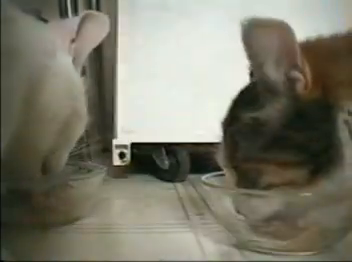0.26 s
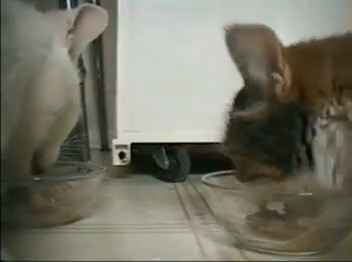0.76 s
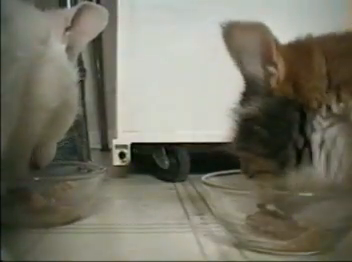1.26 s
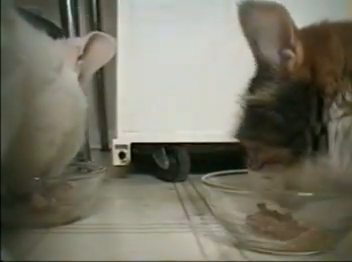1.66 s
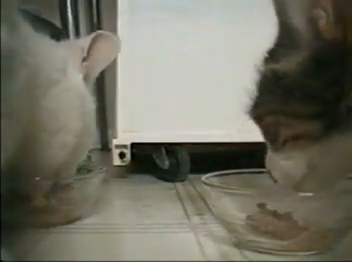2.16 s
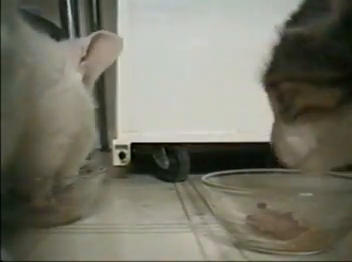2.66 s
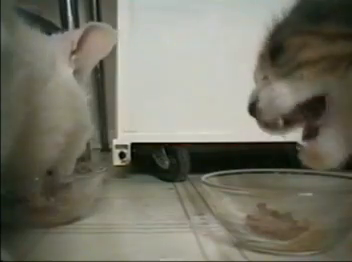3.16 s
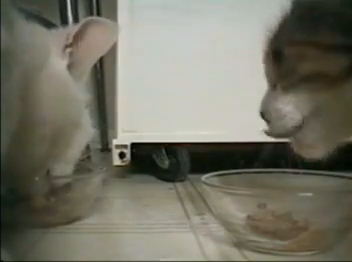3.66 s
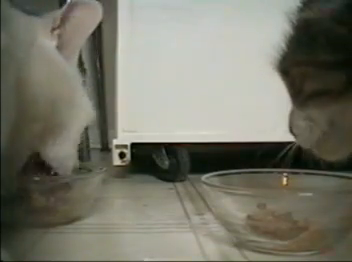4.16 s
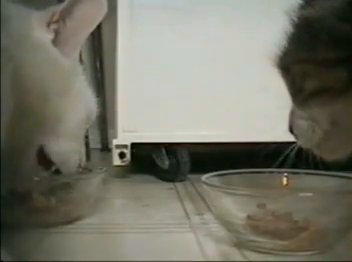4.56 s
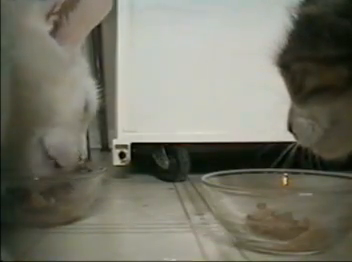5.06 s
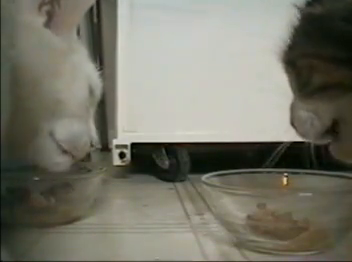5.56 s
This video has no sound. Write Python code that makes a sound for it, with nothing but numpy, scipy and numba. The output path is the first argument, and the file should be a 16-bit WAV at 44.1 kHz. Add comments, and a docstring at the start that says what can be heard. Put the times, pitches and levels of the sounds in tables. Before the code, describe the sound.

A small kitchen, heard close to the floor in stereo, with short, dry reflections. Steady low-mid appliance rumble, soft hiss and a thin wavering whine run throughout. From 0 to about 1.95 s a cat growls low and unevenly, a nasal, rattling buzz that turns brighter and more open with each of five chews; wet smacks and small glass-bowl ticks accompany it, the ticks mostly in the first half second. From 2 to 3 s only sparse moist clicks remain, one strong at 2.8. At about 3.05 a hiss builds into sharp spits near 3.2, then a harder spit and long hiss from 3.35 to 3.75. Around 4.0 come a loud wet smack, glass clicks and a soft sniff. A creak at 4.3 climbs into a clear yowl, peaking near 4.65 and sinking until 5.4. It creaks again, then yelps at 5.65 with two brief snarls, the second at 5.8 with a spit.

```python
"""Cats guarding their bowls

Two cats sit over their food on a kitchen floor, heard close up in stereo.
The eater growls: uneven pulses ring its nose and chewing mouth, with wet smacks and ticks on a glass bowl.
The other cat spits and hisses in shaped noise, then creaks, yowls in clean partials, yelps and snarls.
Coloured noise makes the appliance rumble behind them, and one wavering sine the thin whine.
"""
import sys
import numpy as np
from scipy import signal
from scipy.fft import rfft, irfft
from scipy.io import wavfile
from scipy.ndimage import uniform_filter1d
from numba import njit

SR = 44100
rng = np.random.default_rng(int(sys.argv[2]) if len(sys.argv) > 2 else 0)


def generate_wav(signal):
    """Clip the signal to [-1, 1] and save it as 16-bit WAV at the path in sys.argv[1]."""
    frames = np.transpose(np.atleast_2d(signal))
    scaled = np.clip(frames, -1, 1) * 32767
    pcm = np.round(scaled).astype(np.int16)
    wavfile.write(sys.argv[1], SR, pcm)


N = 257103
T = np.arange(N) / SR

# rumble and hiss of the kitchen: (frequency [Hz], relative density [dB])
ROOM_TONE = [(20, -13.5), (40, -35), (86, -28), (125, -24.5), (170, -17), (260, -5.5), (365, 0.5),
             (480, -4), (690, -10), (1050, -16.5), (1500, -14), (2100, -21), (2700, -22), (3200, -21),
             (4000, -29.5), (5800, -25), (7200, -33.5), (8080, -49), (9000, -34.5), (10200, -36),
             (13300, -45.5), (14200, -59)]
ROOM_TONE_DB, WHINE_HZ, WHINE_DB = -39, 1437, -43.5
# phase between the microphone ports: (frequency [Hz], lead of the left [rad])
PORT_PHASE = [(0, 0), (260, 2.1), (600, 0.7), (950, 1.5), (2150, 0.3), (4650, -0.5), (5170, -1.3),
              (6370, 0.2), (7750, -0.2), (10300, 0.6), (11600, 0.1), (14600, -0.0), (15100, 0.4),
              (15800, -0.3)]
# balance of the ports before panning: (frequency [Hz], left minus right [dB])
PORT_BALANCE = [(60, -1), (110, -2), (200, -7.5), (380, -2.5), (700, -8), (1290, -6.5), (2380, -4),
                (4400, -3), (8120, -3), (15000, -4)]
ROOM_T60_S, ROOM_DB = .05, -5
DIFFUSE_ABOVE_HZ, TOP_HZ = 2500, 15700

# teeth on the glass bowl: (time [s], level [dB])
BOWL_TICKS = [(0.036, -39), (.088, -34.5), (.203, -33), (.325, -29.5), (.378, -29), (0.4437, -35),
              (.454, -33), (3.785, -36), (4.0105, -25), (4.0255, -22.5), (4.046, -31.5), (4.974, -36)]
# partials of the bowl: (frequency [Hz], level [dB], decay by 60 dB [s])
BOWL_PARTIALS = [(4750, -1.5, 0.014), (5904, 0, 0.0062), (9680, -6.5, 0.0042), (12400, -16, .008)]
# wet smacks: (time [s], level [dB], ring [Hz], splash decay [s])
SMACKS = [(0.124, -19, 1460, 0.0037), (0.161, -20.5, 2100, 0.0022), (0.315, -22, 1680, 0.0029),
          (.331, -27, 2500, 0.005), (0.4416, -14, 2260, 0.00076), (0.455, -16, 2360, 0.00054),
          (0.803, -20.5, 1580, 0.0029), (0.9015, -21, 1680, 0.0027), (1.267, -19, 2320, 0.00079),
          (1.491, -22.5, 1586, 0.002), (1.9969, -19.5, 1700, 0.00063), (2.1886, -23, 1650, 0.0007),
          (2.2163, -21.5, 1680, 0.003), (2.237, -16, 2040, 0.0004), (2.2564, -18, 1370, 0.0014),
          (2.456, -25, 1970, 0.00081), (2.465, -26, 1830, 0.00065), (2.607, -29, 1480, 0.0015),
          (2.735, -27, 1510, 0.002), (2.7702, -9.5, 1350, 0.00044), (2.973, -22, 1560, .0015),
          (3.872, -26, 2110, 0.00081), (3.957, -25, 1420, .004), (4.0101, -32, 1450, .001),
          (4.0252, -8.5, 1310, 0.00061), (4.044, -20.5, 830, 0.0022), (5.01, -36, 2390, .002),
          (5.285, -26, 2383, 0.0018)]

# All resonance widths below are those of the narrowest of three stages.
# nose: (centre [Hz], width [Hz], level [dB])
NOSE = [(475.6, 189, 12), (249, 104, 3.5), (758, 180, -7.5)]
# air in the nostrils: (centre [Hz], width [Hz], level [dB])
NOSTRIL_AIR = [(3340, 830, -38.5), (4190, 1100, -35.5), (8150, 3400, -42), (12400, 1400, -49.5)]
# mouth above its moving resonance: (centre [Hz], width [Hz], level [dB])
UPPER_MOUTH = [(1173, 160, -6.5), (2545, 350, -15), (5630, 1600, -30.5), (9800, 2200, -39.5),
               (13900, 1800, -37)]
# a weaker slap of the folds reaches the mouth half an average cycle later
REOPEN_DB = -11

# the long growl: (time [s], pulse rate [Hz], effort [dB], steadiness [0-1])
GROWL = [(0, 133.7, -27.5, 0.12), (.108, 122.6, -26, 0), (.25, 124.5, -23, 0.16), (.33, 119.9, -27.5, 0),
         (.444, 116.3, -23, 0), (.532, 124.1, -23, 0.08), (.602, 124.5, -25, 0.02),
         (.7, 112.8, -27.5, 0.05), (.77, 115, -27, 0.49), (.9, 131.6, -21.5, 0.55),
         (.945, 133.3, -24, 0.46), (1.042, 118.7, -27.5, 0), (1.27, 118.2, -26, 0), (1.4, 124.1, -25, 0),
         (1.48, 126.8, -23, 0.27), (1.766, 123.3, -22.5, 0.95), (1.842, 118.1, -26.5, 0.99),
         (1.93, 119.4, -26.5, 0.8), (1.97, 120.5, -56, 1)]
# jaw drops: (opens [s], shuts [s], first mouth level [dB], last mouth level [dB], mid resonance [Hz])
CHEWS = [(0.078, 0.166, -35, -33, 1390), (0.328, .48, -40.5, -28.5, 1410), (0.602, 0.796, -25, -30, 1490),
         (0.961, 1.118, -23, -23, 1575), (1.307, 1.401, -25, -19.5, 1498)]
JAW_OPEN_S, JAW_SHUT_S, SHUT_MOUTH_DB = 0.039, 0.039, -46.5
# the nose sinks as the jaw stays open
NOSE_DUCK_DB, NOSE_DUCK_S = 7, 0.11
# halfway through a chew the mouth is lifted most and its resonance is highest
JAW_ARCH_DB, JAW_ARCH_HZ = 1, 150
# amounts [0-1] for an unsteady and a steady voice; share of the swing left with the jaw down
ROUGH, SWING, OPEN_SWING = (.2, .12), (.5, 1), .4

# breath at the teeth: (frequency [Hz], relative density [dB])
TEETH = [(1180, 0.5), (2000, -6.5), (2670, -1.5), (3090, -0.5), (3940, 5.5), (4450, 6), (4900, 1.5),
         (6640, 1.5), (7770, -14), (9660, -5), (11700, -10), (14700, -19), (16000, -27)]
# hollow throat: (centre [Hz], width [Hz], level [dB])
THROAT = [(452, 288, 5.5), (1330, 700, -4.5), (2430, 1040, -6)]
# long hisses: (time [s], teeth level [dB], throat relative to teeth [dB])
HISSES = [
    [(3.06, -76, -2), (3.088, -37.5, 1), (3.19, -32, -6), (3.208, -33, -4), (3.22, -28.5, 11.5),
     (3.24, -29.5, 4.5), (3.29, -53.5, 10)],
    [(3.335, -56, 18), (3.357, -25.5, 2.5), (3.379, -35, 6.5), (3.41, -27.5, 1), (3.425, -32, 5),
     (3.522, -33, 1), (3.652, -28.5, 4.5), (3.718, -33, 4.5), (3.75, -59, 3)],
]
# soft sniffs: (start [s], length [s], teeth level [dB], throat relative to teeth [dB])
SNIFFS = [(2.766, 0.105, -59, 19.5), (3.948, 0.028, -45, -13), (4.1, 0.16, -47.5, -16)]
SNIFF_EDGE_S = 0.0067
# spits: (time [s], level [dB], burst length [s], middle ring [dB])
SPITS = [(3.2144, -14.5, 0.0021, -1), (3.219, -12, 0.0075, -10), (3.228, -21.5, 0.0046, -14),
         (3.234, -9, 0.0016, -12), (3.24, -12.5, 0.0067, -10), (3.261, -17, 0.003, -5),
         (3.341, -18, 0.0015, -7), (3.355, -5, 0.0046, -1), (3.379, -11.5, 0.0043, -5),
         (3.408, -10, 0.0057, 2), (5.677, -23, .0033, 15), (5.807, -10, .003, -3)]
# rings of the wide-open mouth: (centre [Hz], width [Hz])
SPIT_RINGS = [(470, 210), (1270, 290), (2550, 550)]
SPIT_LOW_DB, SPIT_HIGH_DB = -8, -0.5

# low creaks before and after the yowl: (time [s], pulse rate [Hz], nose level [dB], mouth level [dB])
CREAKS = [
    [(4.3, 150, -56, -67), (4.345, 136.1, -20, -53), (4.4, 117.2, -23, -27), (4.462, 145.3, -16, -52),
     (4.5, 142, -24.5, -62)],
    [(5.385, 197, -26.5, -43), (5.41, 177.3, -13.5, -37), (5.46, 150.7, -14, -43), (5.53, 142.9, -17, -46),
     (5.565, 139.5, -16, -43), (5.6, 136.5, -20.5, -55), (5.625, 133.3, -29, -55)],
]
CREAK_MOUTH_HZ = 1280
# snarls: (start [s], length [s], mouth level [dB], air level [dB], first resonance [Hz], last resonance [Hz])
SNARLS = [(5.677, 0.037, -14, -26.5, 1230, 1453), (5.797, .04, -18, -32.5, 1400, 1490)]
SNARL_SWELL_S, SNARL_FADE_S, SNARL_AIR_LAG_S, SNARL_QUIET_DB = 0.013, 0.018, 0.013, -15.5
SNARL_LINGER_S, SNARL_LINGER_DB = 0.036, -17
# narrow gap between bared teeth: (centre [Hz], width [Hz], level [dB])
SNARL_WHISTLE = (4930, 1000, 0.67)
# grain of the creaks: (time [s], roughness [0-1], long-short swing [0-1])
CREAK_GRAIN = [(0, .2, .3)]
# grain of the snarls: (time [s], roughness [0-1], long-short swing [0-1])
SNARL_GRAIN = [(0, .3, .3)]
# yowl: (time [s], pitch [Hz], level [dB], extra on the fundamental [dB])
YOWL = [(4.47, 222, -24, -14), (4.504, 287.4, -17.5, 1), (4.556, 381, -13.5, -1),
        (4.588, 417.6, -14.5, -1.5), (4.62, 436, -11.5, -1), (4.694, 434, -10.5, -2.5),
        (4.73, 404, -15.5, 1.5), (4.8, 397, -12.5, -3), (4.89, 384.4, -14, -5.5), (5.024, 364.8, -13.5, 2),
        (5.194, 315.6, -13.5, -1), (5.314, 276.5, -16.5, -0.5), (5.39, 252.8, -17, 2.5),
        (5.42, 234.5, -25, -14)]
# yelp: (time [s], pitch [Hz], level [dB], extra on the fundamental [dB])
YELP = [(5.609, 258.7, -32, -5), (5.64, 360.3, -16, 0), (5.664, 396.8, -6, -14.5),
        (5.685, 304.9, -18.5, 9.5), (5.721, 249, -30, 15.5), (5.742, 358.2, -30, 1),
        (5.83, 303.4, -24, 7.5)]
# throat colour of the first five partials: (frequency [Hz], level [dB])
VOICE_THROAT = [(240, -16), (320, -9.5), (430, -1.5), (520, 3.5), (640, -8.5), (780, -11.5), (1000, -18),
                (1300, -32), (1500, -29), (1750, -58), (2100, -55)]
# sheen of the higher partials: (frequency [Hz], level [dB])
SHEEN = [(2000, -60), (3000, -60), (3450, -44), (3900, -54), (4400, -43), (5000, -60), (11500, -70),
         (12700, -56), (13500, -75)]


def undb(db):
    """Decibels to gain."""
    return 10 ** (np.asarray(db) / 20)


def unit(x):
    """Scale to rms 1."""
    return x / np.sqrt(np.mean(x ** 2))


def curves(table, edge_s=0.035):
    """A gate that ramps just outside the table's span, then each column at every sample."""
    s, *columns = np.transpose(table)
    nearest_edge = np.minimum(T - s[0] + edge_s, s[-1] + edge_s - T)
    gate = np.clip(nearest_edge / edge_s, 0, 1)
    return [gate] + [np.interp(T, s, c) for c in columns]


def span(table):
    """Samples from the first to the last time, with 400 to spare at each end."""
    return slice(max(int(table[0][0] * SR) - 400, 0), int(table[-1][0] * SR) + 400)


def spectrum(table, hz):
    """Read (frequency, value) points on a log-frequency axis."""
    f, v = np.transpose(table)
    return np.interp(np.log(hz + 1), np.log(f + 1), v)


def coloured(table):
    """White noise filtered to a spectrum, at rms 1."""
    gain = undb(spectrum(table, np.fft.rfftfreq(N, 1 / SR)))
    return unit(irfft(rfft(rng.standard_normal(N)) * gain, N))


def walk(rate):
    """Random drift: levels held for 1 / rate seconds and smoothed twice, spread near 1."""
    k = int(SR / rate)
    steps = np.repeat(rng.standard_normal(N // k + 1), k)
    return 1.3 * uniform_filter1d(uniform_filter1d(steps, k), k)[:N]


@njit
def svf(x, hz, width):
    """State-variable band-pass with a moving centre, gain 1 there."""
    y, band, low = np.empty(len(x)), 0., 0.
    for i in range(len(x)):
        g, k = np.tan(np.pi * hz[i] / SR), width / hz[i]
        v = (band + g * (x[i] - low)) / (1 + g * (g + k))
        band, low, y[i] = 2 * v - band, low + 2 * g * v, k * v
    return y


def ring(x, hz, width):
    """A steep resonance: three band-passes in a row, each wider than the last."""
    hz = hz + np.zeros(len(x))
    return svf(svf(svf(x, hz, 1. * width), hz, 2. * width), hz, 3. * width)


def modes(x, table):
    """Sum of fixed resonances, alternating in sign."""
    return sum((-1) ** k * undb(db) * ring(x, f, w) for k, (f, w, db) in enumerate(table))


def treble(x):
    """The part of a sound that scatters."""
    return signal.sosfilt(signal.butter(2, DIFFUSE_ABOVE_HZ, "high", fs=SR, output="sos"), x)


def ports(x, pan_db):
    """Two close microphone ports hear one sound with their own phase and level; pan favours the left."""
    hz = np.fft.rfftfreq(N, 1 / SR)
    half = undb((spectrum(PORT_BALANCE, hz) + pan_db) / 2) * np.exp(.5j * spectrum(PORT_PHASE, hz))
    pair = np.array([half, 1 / half])
    # the mean of both ports keeps the source's spectrum
    return irfft(rfft(x) * pair / np.abs(pair.mean(axis=0)), N)


def diffuse(x, db):
    """Treble from all sides, opposed and uneven between the ports."""
    return undb(db) * treble(x) * np.array([[.7], [-1]])


def room(x):
    """Floor, bowls and cupboards scatter the treble into a short tail, different at each port."""
    t = np.arange(int(.3 * SR)) / SR
    tail = rng.standard_normal((2, len(t))) * np.exp(-np.log(1000) * t / ROOM_T60_S) * (t > .001)
    tail = tail / np.sqrt(np.sum(tail[0] ** 2))
    return undb(ROOM_DB) * signal.fftconvolve(treble(x)[None], tail, axes=1)[:, :N]


def kitchen():
    """Appliance rumble and hiss as coloured noise, diffuse in the treble, and a whine that wavers."""
    phase = 2 * np.pi * np.cumsum(WHINE_HZ + 1.57 * walk(8)) / SR
    whine = np.sqrt(2) * np.sin(phase) * undb(WHINE_DB + 1.8 * walk(25.02))
    rumble = coloured(ROOM_TONE) * undb(ROOM_TONE_DB + 1.3 * walk(12))
    return ports(rumble + whine, 1.6) + diffuse(coloured(ROOM_TONE), ROOM_TONE_DB + 2.5)


def ticks():
    """The glass bowl rings briefly under a tooth, as decaying sines."""
    t, hits = np.arange(2000) / SR, np.zeros(N)
    for s, db in BOWL_TICKS:
        hits[int(s * SR)] = undb(db)
    bowl = sum(undb(db) * np.sin(2 * np.pi * hz * t) * np.exp(-np.log(1000) * t / t60)
               for hz, db, t60 in BOWL_PARTIALS)
    return signal.fftconvolve(hits, bowl)[:N]


def smacks(cycles=2.3, splash_db=3, thud_db=-15, thud_hz=450, thud_s=0.0071):
    """A popping film of spit rings a small cavity, with a splash of noise and a dull thud."""
    out, t = np.zeros(N + 2000), np.arange(2000) / SR
    noise = rng.standard_normal((len(SMACKS), 2000))
    for (s, db, hz, splash_s), n in zip(SMACKS, noise):
        pop = np.sin(2 * np.pi * hz * t) * np.exp(-t * hz / cycles) * np.minimum(t * hz, 1)
        spray = n * np.exp(-t / max(splash_s, 1e-4))
        splash = undb(splash_db) * ring(spray, 1.15 * hz, .6 * hz)
        thud = undb(thud_db) * np.sin(2 * np.pi * thud_hz * t) * np.exp(-t / thud_s)
        start = int(s * SR)
        out[start:start + len(t)] += undb(db) * (pop + splash + thud)
    return out[:N]


def snarl_shape(s, length, db):
    """Times and levels of one snarl: swell, hold, fade, a weak tail."""
    end = s + length + SNARL_FADE_S
    times = [s - SNARL_SWELL_S, s, s + length, end, end + SNARL_LINGER_S]
    return times, db + np.array([SNARL_QUIET_DB, 0, 0, SNARL_LINGER_DB, SNARL_LINGER_DB])


def hiss(snarl_throat_db=-4):
    """Breath forced past the teeth: fluttering bright noise with a hollow throat under it."""
    teeth = coloured(TEETH) * undb(1.5 * walk(150))
    throat = unit(modes(rng.standard_normal(N), THROAT))
    out = 0
    for table in HISSES:
        gate, db, throat_db = curves(table, edge_s=0.0023)
        out = out + gate * undb(db) * (teeth + undb(throat_db) * throat)
    # the air of the snarls whistles through bared teeth
    hz, width, whistle_db = SNARL_WHISTLE
    whistle = undb(whistle_db) * unit(ring(teeth, hz, width))
    bared = teeth + whistle + undb(snarl_throat_db) * throat
    for s, length, _, db, *_ in SNARLS:
        shape = snarl_shape(s, length + SNARL_AIR_LAG_S, db)
        gate, air_db = curves(np.transpose(shape), edge_s=0.0021)
        out = out + gate * undb(air_db) * bared
    for s, length, db, throat_db in SNIFFS:
        gate = curves([(s,), (s + length,)], SNIFF_EDGE_S)[0] ** 2
        out = out + gate * undb(db) * (teeth + undb(throat_db) * throat)
    return out


def spits(crack_db=-8, crack_hz=4500, snap=4.7):
    """Lips snap apart and a short burst of wet air rings the wide-open mouth."""
    out, t = np.zeros(N + 2000), np.arange(2000) / SR
    noise = rng.standard_normal((len(SPITS), 2000))
    for (s, db, length_s, middle_db), n in zip(SPITS, noise):
        burst = n * np.exp(-(t / length_s) ** 3) * (1 + snap * np.exp(-t / .0004))
        rings = [ring(burst, hz, width) for hz, width in SPIT_RINGS]
        rings.append(ring(burst, crack_hz, crack_hz))
        levels_db = [SPIT_LOW_DB, middle_db, SPIT_HIGH_DB, crack_db]
        sound = sum(undb(g) * r / np.max(np.abs(r)) for g, r in zip(levels_db, rings))
        start = int(s * SR)
        out[start:start + len(t)] += undb(db) * sound
    return out[:N]


def nostrils(air):
    """Faint airy bands that ride on a voice."""
    return sum(undb(db) * unit(ring(air, hz, width)) for hz, width, db in NOSTRIL_AIR)


def pulsed_voice(tract, rate, grain, mouth_width_hz=650, nose_top_hz=1200, puff=.35, rasp=2.6):
    """Vocal folds slap shut unevenly, long and short cycles in turn, and ring nose and mouth."""
    on = span(tract)
    gate, nose_db, mouth_db, mouth_hz = (c[on] for c in curves(tract))
    rough, swing = (c[on] for c in curves(grain)[1:])
    hz = curves(rate)[1][on] * (1 + .08 * rough * walk(30)[on])
    at = np.flatnonzero(np.diff(np.floor(np.cumsum(hz) / SR)))
    chance, turn = rng.standard_normal((len(at), 2)).T, (-1.) ** np.arange(len(at))
    size = undb(8 * rough[at] * chance[0] + 1.2 * swing[at] * turn)
    shift = .15 * rough[at] * chance[1] + .06 * swing[at] * turn  # in cycles
    at = np.clip(at + (shift * SR / hz[at]).astype(int), 0, len(hz) - 1)
    pulses = np.zeros(len(hz))
    pulses[at] = size / np.sqrt(hz[at])
    # soft tissue muffles the path through the nose
    muffle = signal.butter(4, nose_top_hz, fs=SR, output="sos")
    nose = unit(signal.sosfilt(muffle, modes(pulses, NOSE)))
    # each opening lets out a puff of turbulent air, dying away over a fraction (puff) of a cycle
    puffs = signal.lfilter([1], [1, -np.exp(-np.mean(hz) / puff / SR)], pulses)
    air = puffs * rng.standard_normal(len(hz))
    drive = unit(pulses) + rasp * rough * unit(air)
    drive = drive + undb(REOPEN_DB) * np.roll(drive, int(SR / np.mean(hz) / 2))
    mouth = svf(ring(drive, mouth_hz, mouth_width_hz), mouth_hz, 2. * mouth_width_hz)
    mouth = mouth + modes(drive, UPPER_MOUTH)
    out = np.zeros(N)
    out[on] = gate * (undb(nose_db) * (nose + nostrils(unit(air))) + undb(mouth_db) * unit(mouth))
    return out


def creaks():
    """Slow fold pulses with the mouth nearly shut."""
    out = 0
    for creak in CREAKS:
        tract = [(s, nose_db, mouth_db, CREAK_MOUTH_HZ) for s, _, nose_db, mouth_db in creak]
        out = out + pulsed_voice(tract, creak, CREAK_GRAIN)
    return out


def snarls(nose_db=-50):
    """The mouth flies open on rough pulses at the yelp's pitch."""
    out = 0
    for s, length, db, _, hz, last_hz in SNARLS:
        times, mouth_db = snarl_shape(s, length, db)
        mouth_hz = np.interp(times, [s, s + length], [hz, last_hz])
        tract = np.transpose([times, nose_db + 0 * mouth_db, mouth_db, mouth_hz])
        out = out + pulsed_voice(tract, YELP, SNARL_GRAIN)
    return out


def clear_voice(table, waver=0.0037, flutter_db=1.5, breath_db=-4, count=36):
    """Smoothly swinging folds: clean partials coloured by the throat, and a faint sheen of high ones."""
    on = span(table)
    gate, hz, level_db, first_db = (c[on] for c in curves(table))
    phase = 2 * np.pi * np.cumsum(hz * (1 + waver * walk(60)[on])) / SR
    voice = 0
    for k in range(1, count):
        colour = VOICE_THROAT if k < 6 else SHEEN
        db = level_db + spectrum(colour, k * hz) + first_db * (k == 1)
        voice = voice + np.sqrt(2) * undb(db) * np.sin(k * phase + k * k)
    breath = undb(level_db + breath_db) * nostrils(rng.standard_normal(len(hz)))
    out = np.zeros(N)
    out[on] = gate * (voice + breath)
    return out * undb(flutter_db * walk(40))


def growl():
    """Effort drives the nose; each chew opens the mouth and dims the nose."""
    s = np.arange(0, GROWL[-1][0], .004)
    times, _, effort, steadiness = np.transpose(GROWL)
    nose_db, steady = np.interp(s, times, effort), np.interp(s, times, steadiness)
    mouth_db, mouth_hz, jaw = SHUT_MOUTH_DB + 0 * s, 0 * s + CHEWS[0][-1], 0 * s
    for opens, shuts, first_db, last_db, hz in CHEWS:
        down = np.clip(np.minimum((s - opens) / JAW_OPEN_S + .5, (shuts - s) / JAW_SHUT_S + .5), 0, 1)
        arch = np.sin(np.pi * np.clip((s - opens) / (shuts - opens), 0, 1))
        open_db = np.interp(s, [opens, shuts], [first_db, last_db])
        mouth_db = mouth_db + down * (open_db - SHUT_MOUTH_DB) + JAW_ARCH_DB * arch
        nose_db = nose_db - NOSE_DUCK_DB * down * np.clip((s - opens) / NOSE_DUCK_S, 0, 1)
        mouth_hz = np.where(down > 0, hz + JAW_ARCH_HZ * (arch - .5), mouth_hz)
        jaw = jaw + down
    rough, swing = np.interp(steady, [0, 1], ROUGH), np.interp(steady, [0, 1], SWING)
    grain = np.transpose([s, rough, swing * (1 - (1 - OPEN_SWING) * jaw)])
    return pulsed_voice(np.transpose([s, nose_db, mouth_db, mouth_hz]), GROWL, grain)


def scene():
    """Both cats, their echo and the kitchen."""
    eater = growl() + smacks() + ticks()
    spitter = hiss() + spits()
    yowler = creaks() + clear_voice(YOWL) + clear_voice(YELP) + snarls()
    cats = ports(eater, 0.13) + ports(spitter, -0.71) + ports(yowler, -2.2)
    cats = cats + room(eater + spitter + yowler)
    # a second, independent layer of hiss spreads the breath
    cats = cats + diffuse(hiss(), -5)
    # the cats' sounds fall away steeply below about 185 Hz
    return signal.sosfilt(signal.butter(4, 185, "high", fs=SR, output="sos"), cats) + kitchen()


def record(dry):
    """The recorder clips at full scale, then cuts the top steeply."""
    return signal.sosfilt(signal.ellip(10, .2, 80, TOP_HZ, fs=SR, output="sos"), np.clip(dry, -1, 1))


dry = scene()
out = record(dry)
generate_wav(out)
```